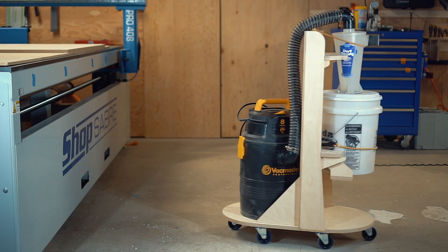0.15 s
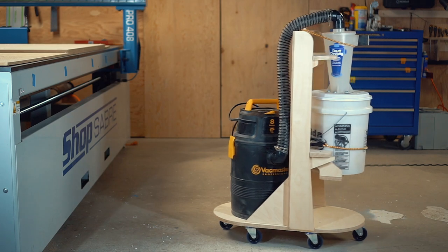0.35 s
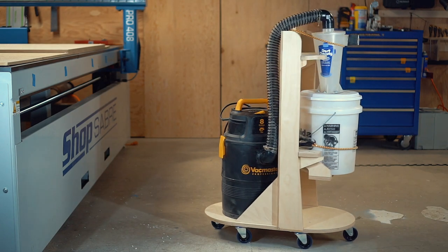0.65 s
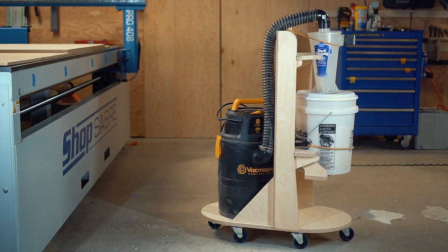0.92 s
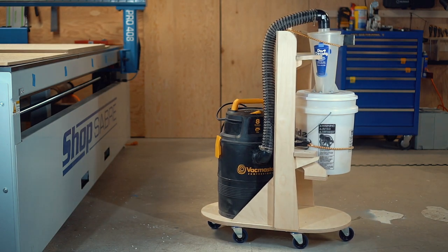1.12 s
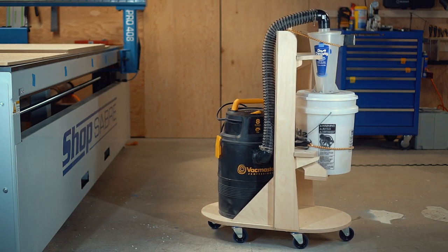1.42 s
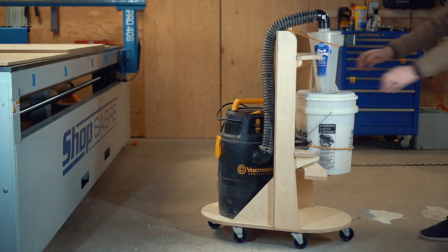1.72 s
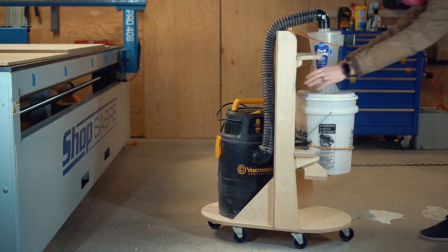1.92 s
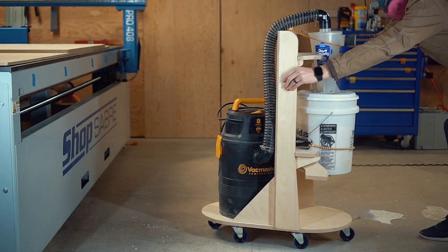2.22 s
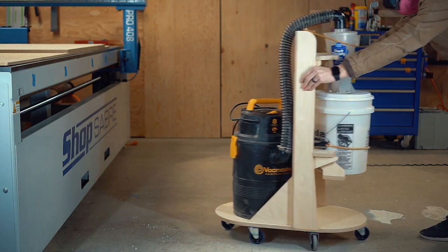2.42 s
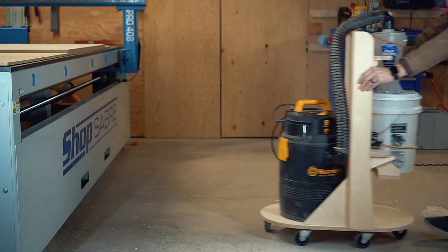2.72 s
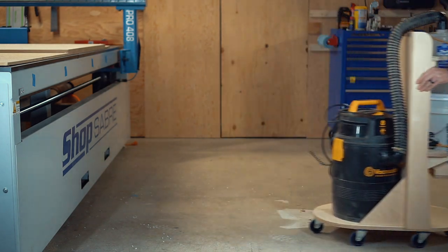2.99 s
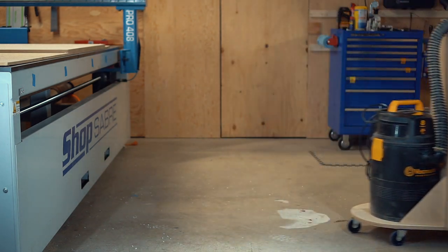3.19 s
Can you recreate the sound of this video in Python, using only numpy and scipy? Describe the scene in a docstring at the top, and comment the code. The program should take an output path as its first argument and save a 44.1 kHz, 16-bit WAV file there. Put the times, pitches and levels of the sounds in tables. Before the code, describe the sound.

A loaded plywood cart on hard casters fades to rest on concrete, with faint bumps at 0.1 and 0.7 seconds. Quiet workshop air and wavering low hum remain; a barely audible squeak comes around 1.2, a soft sleeve rustle at 1.7. Small creaky knocks start near 2.25, then from 2.5 sharp steel ticks, hollow wooden booms and rattling roll loudly, irregularly to the end at 3.3, with short room echoes.

```python
"""A cart's roll dies away as it coasts to a stop; it is then pulled off with loud booms, knocks and ticks.
The plywood cart rides hard casters on concrete: random grit pushes ring its deck, load, wheels and steel.
Bumps are short scuffs into the same resonances; ticks are noise cracks with ringing steel modes.
A faint squeak is narrow filtered noise, and a sleeve rustles as an arm reaches out: a swell of noise.
Behind lie the workshop's echoes from feedback delays, air noise, a low rumble and a wavering hum."""
import sys
import numpy as np
from scipy import signal
from scipy.io import wavfile

SR = 44100
rng = np.random.default_rng(int(sys.argv[2]) if len(sys.argv) > 2 else 0)


def dump(signal):
    """Clip the signal to [-1, 1] and save it as 16-bit WAV at the path in sys.argv[1]."""
    limited = np.clip(np.atleast_2d(signal).T, -1, 1)
    pcm = np.round(limited * 32767).astype(np.int16)
    wavfile.write(sys.argv[1], SR, pcm)


def rack_gain(trim_db):
    """Turn a fader trim in dB into the linear factor to multiply a signal by."""
    fader = np.asarray(trim_db, float)
    return 10 ** (fader / 20)


N = 147735  # length in samples

# Rolling levels. Each row: start in seconds, then level in dB of deck boom, deck rumble, load rattle,
# wheel grit, caster-fork hiss and ball-bearing sizzle; levels glide from row to row.
ROLL_LEVELS = [
    [0.03, -44, -43, -55, -70, -76, -81],
    [0.14, -43, -48, -52.5, -77, -72, -88],
    [0.37, -57.5, -61.5, -65, -81, -80, -81],
    [0.68, -53, -55, -66, -72, -74, -80],
    [0.71, -44.5, -55, -51, -65, -65, -80],
    [0.78, -52.5, -54.5, -57.5, -68.5, -74, -83],
    [1.48, -63, -60, -63, -74, -71, -81],
    [1.74, -55, -60.5, -63, -66, -63.5, -68],
    [2.08, -59.5, -65, -64, -74, -73, -80],
    [2.2, -56, -45.5, -62, -70, -68, -69],
    [2.23, -53, -56, -76, -67, -69, -75],
    [2.254, -42, -44, -57, -69, -66, -73],
    [2.262, -31, -36, -39, -60, -64, -75],
    [2.294, -47, -42.5, -48, -78, -72, -76],
    [2.32, -44, -35, -42, -57, -62, -68],
    [2.354, -46, -36, -43.5, -66, -66, -80],
    [2.404, -39, -39.5, -51, -67, -72, -76],
    [2.412, -37.5, -43, -44.5, -49, -50, -60],
    [2.422, -41.5, -36, -46.5, -59, -65, -78],
    [2.478, -40, -45, -46, -71, -67, -65],
    [2.492, -35, -36, -32.5, -41.5, -50, -58.5],
    [2.584, -33, -29, -34, -45, -43, -46.5],
    [2.674, -20.5, -23, -25.5, -37, -38.5, -41.5],
    [2.72, -33.5, -31.5, -33.5, -46.5, -47, -53.5],
    [2.842, -30.5, -31, -33.5, -50, -52, -65],
    [2.876, -17.5, -34, -36, -54, -58, -67],
    [2.89, -23, -27, -27.5, -40.5, -45, -47.5],
    [2.98, -29.5, -26.5, -25, -39.5, -46, -54.5],
    [3.038, -29, -27, -31.5, -46.5, -55, -66],
    [3.096, -29, -28, -27.5, -46.5, -55, -61],
    [3.14, -36, -27, -33, -44, -60, -66],
    [3.154, -36, -23, -24, -40, -51, -54],
    [3.182, -28.5, -38, -33, -47, -54, -59],
    [3.192, -42, -30, -26, -41, -58, -57],
    [3.218, -37, -33, -30.5, -52, -64, -61],
    [3.224, -26.5, -30.5, -25.5, -39.5, -56, -64],
    [3.33, -39.5, -31.5, -28.5, -44.5, -58, -62],
]
# Resonances of the cart, from the deck's boom up to the ball bearings.
# Each row: frequency in Hz, width in Hz, relative level in dB.
BOOM_MODES = [(282, 37, -9.5), (336.5, 27.7, 0), (402, 52.4, -2.5), (442.2, 41.5, 2.5), (475.6, 54, -2)]
DECK_MODES = [(538, 48.4, -2.5), (658.5, 56, -3), (717.5, 37, -0.5), (878, 200, -11)]
LOAD_MODES = [(1038, 121, 3.5), (1333, 176, 1.5), (1550, 160, 2.5), (1810, 276, -1.5), (2078, 295, -3),
              (2410, 265, -3.5), (2580, 280, -1.5), (2685, 670, -7)]
WHEEL_MODES = [(3130, 230, -2.3), (3870, 370, 1), (3980, 660, -0.94), (4740, 400, -4.2)]
CASTER_MODES = [(5230, 1150, -3.5), (6020, 320, 2.5), (7000, 930, -5), (7700, 550, -1), (8300, 1160, -6.5)]
BEARING_MODES = [(9370, 740, -0.5), (10040, 1160, 6), (11200, 1500, 3), (12800, 1400, -0.5),
                 (14500, 2000, -12.5)]
# Grit texture. Each has one column per part: boom, deck, load, casters, bearings, wheels.
# In turn: pushes per second, spread of push sizes in dB, spread of the level flicker in dB.
PUSHES_PER_S = (899, 1020, 1787, 2500, 3000, 2500)
PUSH_SPREAD_DB = (2.86, 2.06, 2.42, 1.3, 2.7, 3)
GRIT_FLICKER_DB = (0.5, 0.42, 0.47, 0.91, 4.1, 0.38)
BOOM, DECK, LOAD, CASTERS, BEARINGS, WHEELS = range(6)  # columns of the three tables above
# Bumps that knock the cart. Each row: start in seconds, peak in dB, load against deck in dB.
BUMPS = [(0.099, -32.5, -4), (0.701, -30.5, -5.5), (2.182, -37, -25), (2.244, -40, -24),
         (2.264, -21.5, -13), (2.303, -30, -14), (2.323, -31, -1), (2.34, -29, -7), (2.489, -24.5, 0),
         (2.666, -11.5, -3), (2.895, -15.5, -3), (2.969, -17.5, -3), (3.012, -17.5, -14), (3.074, -16, -9),
         (3.088, -11, 4), (3.15, -16, -6.5), (3.192, -12, -3), (3.227, -15, 12), (3.245, -28, -6),
         (3.263, -27, -8), (3.317, -16.5, -4.5)]
# Ticks of the cart's steel casters and ball bearings. Each row: start in seconds, level in dB, frequency in Hz
# that the blow favours.
STEEL_TICKS = [(.099, -46, 6670), (.114, -44.5, 3600), (.697, -39.5, 6750), (.700, -38, 3600),
               (.716, -38, 3600), (.701, -41, 2500), (.722, -47, 2500), (1.714, -46.5, 10100),
               (2.260, -37, 2580), (2.281, -55, 2580), (2.292, -51, 2580), (2.340, -44, 2580),
               (2.385, -47, 2580), (2.316, -50, 7260), (2.323, -48, 4000), (2.325, -51, 10100),
               (2.412, -38, 7620), (2.431, -42, 5160), (2.493, -27, 6020), (2.497, -30, 7620),
               (2.508, -44, 6020), (2.520, -26, 6020), (2.540, -37, 6020), (2.566, -34, 6020),
               (2.523, -38, 12900), (2.573, -40, 10100), (2.574, -40, 12900), (2.624, -22, 11200),
               (2.637, -24, 4100), (2.666, -27, 6020), (2.893, -25.5, 7000), (2.894, -24, 2500),
               (2.912, -33, 7500), (2.968, -18, 3700), (2.985, -25, 3720), (3.071, -33.5, 6020),
               (3.088, -33, 4500), (3.089, -27, 2450), (3.097, -44, 10100), (3.112, -39, 11200),
               (3.158, -36, 7700), (3.177, -51, 10700), (3.191, -38, 7620), (3.192, -26, 2400),
               (3.196, -36, 10200), (3.228, -14, 2780), (3.326, -53, 10300)]
# Ringing modes of the steel. Each row: frequency in Hz, relative level in dB, time to fall 60 dB in seconds.
STEEL_MODES = [(2400, -3, 0.044), (2580, -2.5, 0.068), (3600, -5.5, 0.039), (4100, -6, .03),
               (5110, -5, 0.022), (6050, -5.5, 0.042), (6730, -0.5, 0.014), (7620, -1.5, 0.036),
               (8250, -14, 0.023), (10220, -0.5, 0.016), (11100, -3, 0.012), (12900, -3, .015)]
# Faint wheel squeak. Each row: time in seconds, level in dB.
SQUEAK_LEVEL = [(1.08, -81), (1.15, -56), (1.28, -57.5), (1.42, -61), (1.5, -81)]
# Colour of the sleeve's cloth noise. Each row: frequency in Hz, relative level in dB per Hz.
SLEEVE_COLOUR = [(1470, -3.5), (2500, -1.5), (3690, -23), (6590, 4.5), (8420, -19), (13500, -12),
                 (15500, -17)]
# Colour of the room's air noise. Each row: frequency in Hz, relative level in dB per Hz.
AIR_COLOUR = [(40, -43), (52, -20), (80, -8.5), (130, -12.5), (250, -6.5), (400, -17.5), (570, -13.5),
              (850, -20.5), (1300, -24.5), (2080, -30.5), (3500, -36.5), (7000, -38.5), (15700, -42.5)]
# Stereo width of air and cloth noise. Each row: frequency in Hz, left-right likeness from 0 to 1.
STEREO_LIKENESS = [(60, 0.99), (240, 1), (950, 0.65), (3770, 0.13), (15000, 0.12)]
# Low rumble in the room. Each row: time in seconds, level in dB.
RUMBLE_LEVEL = [(0.0, -57), (0.17, -39), (0.23, -50.5), (0.69, -43.5), (0.73, -50.5), (2.64, -47),
                (2.67, -59), (2.77, -57), (3.32, -50.5), (3.35, -42)]
# Band of that rumble: lower edge in Hz, upper edge in Hz.
RUMBLE_BAND = [93, 165]
# Room hum. Each row: frequency in Hz, level in dB rms before wavering, spread of the waver in dB.
HUM_TONES = [(58, -48, 1.5), (117, -52.5, 3.5)]

WANDER_DB, WANDER_PER_S = 1.6, 12  # each resonance comes and goes as the load shifts
CONTACT_S, WHEEL_KNOCK_DB = 0.0013, -11.5  # decay of a bump's scuff; wheels' share in a knock
FAVOUR_DB_PER_OCT = 60  # how fast steel modes weaken away from the favoured one
CRACK_DB, CRACK_S = -14, 0.0018  # a tick's crack against its modes, and its decay
SQUEAK_HZ, SQUEAK_WIDTH_HZ = 1007, 45
SLEEVE_S, SLEEVE_RISE_S, SLEEVE_FALL_S, SLEEVE_DB = 1.722, 0.045, 0.098, -52.5  # middle and slopes of the swell
AIR_DB = -48.5
WOOD_PAN_DB, STEEL_PAN_DB, BEARING_PAN_DB = 0.74, 3, 4.5  # left minus right
BEARINGS_ALIKE = 0.31  # share of the sizzle common to both sides
SHOP_T60_S, WALL_CUT_HZ, WET_DB = 0.36, 7800, -18.5
WIDE_DB, WIDE_HZ = 7, 2500  # level and low cut of the echoes' left-right difference


def rms_one(x):
    """Scale to rms 1."""
    return x / np.sqrt(np.mean(x ** 2) + 1e-20)


def in_time(rows):
    """Draw each level column as a curve, sample by sample."""
    seconds, *columns = np.transpose(rows)
    return [np.interp(np.arange(N) / SR, seconds, column) for column in columns]


def at_hz(points, hz):
    """Read a spectrum on a log frequency axis."""
    point_hz, value = np.transpose(points)
    return np.interp(np.log(hz), np.log(point_hz), value)


def drift(rate):
    """Slow random movement of rms 1: noise through two low-pass poles at rate Hz."""
    every = 40  # samples between points of the curve
    r = np.exp(-2 * np.pi * every * rate / SR)
    noise = rng.standard_normal(N // every + 2002)
    slow = signal.lfilter([1], [1, -2 * r, r * r], noise)[2000:]  # skip the filter's run-in
    return np.interp(np.arange(N) / every, np.arange(len(slow)), rms_one(slow))


def ring(push, hz, width_hz):
    """Two-pole resonance: a unit click sets a decaying sine of height 1 ringing."""
    r, w = np.exp(-np.pi * width_hz / SR), 2 * np.pi * hz / SR
    return signal.lfilter([0, np.sin(w)], [1, -2 * r * np.cos(w), r * r], push + 1e-18)


def cut(x, hz, kind, order=2):
    """Butterworth filter."""
    return signal.sosfilt(signal.butter(order, hz, kind, fs=SR, output="sos"), x)


def body(push, modes, wander_db=0):
    """A push rings parallel resonances of alternating sign, each free to wander in level."""
    out = 0
    for k, (hz, width_hz, db) in enumerate(modes):
        drive = push
        if wander_db:
            drive = push * rack_gain(wander_db * drift(WANDER_PER_S))
        out = out + (-1) ** k * rack_gain(db) * width_hz * ring(drive, hz, width_hz)
    return out


def pan(x, db):
    """Place by level difference, left minus right."""
    return x * rack_gain(np.array([[db / 2], [-db / 2]]))


def shaken(part, modes, level_db):
    """Grit under the wheels: random little pushes ring one part of the cart."""
    size_db = PUSH_SPREAD_DB[part] * np.minimum(rng.exponential(1, N), 5)
    sizes = rack_gain(size_db) * rng.choice([-1, 1], N)
    grit = sizes * (rng.random(N) < PUSHES_PER_S[part] / SR)
    sound = cut(body(grit, modes, WANDER_DB), 0.71 * modes[0][0], "high", order=4)
    flicker_db = GRIT_FLICKER_DB[part] * drift(29.5)
    return rack_gain(level_db + flicker_db) * rms_one(sound)


def knocks():
    """Each bump is a short noisy scuff ringing deck, load and wheels, with mode strengths of its own."""
    out, t = np.zeros(N), np.arange(SR // 4) / SR
    wheels = [(hz, width_hz, db + WHEEL_KNOCK_DB) for hz, width_hz, db in WHEEL_MODES]
    for s, peak_db, load_db in BUMPS:
        modes = []
        for hz, width_hz, db in BOOM_MODES + DECK_MODES + LOAD_MODES + wheels:
            # the load setting also moves the wheels
            modes.append((hz, width_hz, db + load_db * (hz > 950) + rng.normal(0, 3)))
        scuff = (1 + rng.standard_normal(len(t))) * np.exp(-t / CONTACT_S)
        sound = cut(body(scuff, modes), [240, 5500], "band")
        sound *= rack_gain(peak_db) / np.abs(sound).max()
        i = int(s * SR)
        out[i:i + len(t)] += sound[:N - i]
    return out


def ticks():
    """A short noise crack plus decaying steel modes, strongest near the one that the blow favours."""
    out, t = np.zeros(N), np.arange(SR // 8) / SR
    click = np.eye(1, len(t))[0]
    for s, db, top_hz in STEEL_TICKS:
        noise = cut(rng.standard_normal(len(t)), [0.36 * top_hz, 1.7 * top_hz], "band", order=3)
        sound = rack_gain(CRACK_DB) * rms_one(noise) * np.exp(-t / CRACK_S)
        for hz, mode_db, t60 in STEEL_MODES:
            octaves_off = abs(np.log2(hz / top_hz))
            width_hz = np.log(1000) / np.pi / t60
            sound += rack_gain(mode_db - FAVOUR_DB_PER_OCT * octaves_off) * ring(click, hz, width_hz)
        i = int(s * SR)
        out[i:i + len(t)] += (rack_gain(db) * sound)[:N - i]
    return out


def squeak():
    """A wheel's squeak: noise twice through one narrow resonance."""
    once = ring(rng.standard_normal(N), SQUEAK_HZ, SQUEAK_WIDTH_HZ)
    twice = ring(once, SQUEAK_HZ, SQUEAK_WIDTH_HZ)
    return rack_gain(in_time(SQUEAK_LEVEL)[0]) * rms_one(twice)


def shop(x):
    """Workshop echoes: 16 feedback delays, duller every round, half central and half left-right difference."""
    out, dull = np.zeros((2, N)), np.exp(-2 * np.pi * WALL_CUT_HZ / SR)
    lags = (rng.uniform(0.011, 0.04, 16) * SR).astype(int)
    for k, lag in enumerate(lags):
        loop, state = x.copy(), [0.]
        gain = rack_gain(-60 * lag / SR / SHOP_T60_S)
        for i in range(lag, N, lag):
            back, state = signal.lfilter([gain * (1 - dull)], [1, -dull], loop[i - lag:i], zi=state)
            loop[i:i + lag] += back[:N - i]
        out[k % 2] += (loop - x) * (-1) ** (k // 2)
    centre, difference = out
    wide = rack_gain(WIDE_DB) * cut(difference, WIDE_HZ, "high", order=1)
    return centre + wide * [[1], [-1]]


def banded_noise(spectrum, patchy_db):
    """Half-octave bands of stereo noise, each with its own level, flicker and likeness; rms 1."""
    out, edges = 0, 25 * 2 ** np.arange(0, 9.6, 0.5)
    white = rng.standard_normal((2, 2, N))  # neighbouring bands use different noise
    for k, (low, high) in enumerate(zip(edges, edges[1:])):
        mid, side = cut(white[k % 2], [low, high], "band")
        hz = np.sqrt(low * high)
        alike = np.clip(at_hz(STEREO_LIKENESS, hz), 0, 0.997)
        stereo = np.sqrt(1 + alike) * mid + np.sqrt(1 - alike) * side * [[1], [-1]]
        out = out + rack_gain(at_hz(spectrum, hz) + patchy_db * drift(15)) * stereo
    return rms_one(out)


def sleeve():
    """A soft swell of cloth noise, rising faster than it falls."""
    t = np.arange(N) / SR - SLEEVE_S
    slope_s = np.where(t < 0, SLEEVE_RISE_S, SLEEVE_FALL_S)
    swell = np.exp(-0.5 * (t / slope_s) ** 2)
    return rack_gain(SLEEVE_DB) * swell * banded_noise(SLEEVE_COLOUR, patchy_db=0.0)


def room_tone():
    """Air noise, a low band of rumble and hum tones wavering in level and phase."""
    t, hum = np.arange(N) / SR, 0
    for hz, db, waver_db in HUM_TONES:
        level = rack_gain(db + waver_db * drift(1.6)) * np.sqrt(2)
        hum = hum + level * np.sin(2 * np.pi * hz * t + 0.65 * drift(1.6))
    rumble = rack_gain(in_time(RUMBLE_LEVEL)[0]) * rms_one(cut(rng.standard_normal(N), RUMBLE_BAND, "band"))
    return rack_gain(AIR_DB) * banded_noise(AIR_COLOUR, patchy_db=0.57) + hum + rumble


def scene():
    """Mix the cart's wood, steel and bearings with their echoes, the sleeve and the room."""
    boom_db, deck_db, load_db, wheel_db, caster_db, bearing_db = in_time(ROLL_LEVELS)
    wood = shaken(BOOM, BOOM_MODES, boom_db) + shaken(DECK, DECK_MODES, deck_db)
    wood = wood + shaken(LOAD, LOAD_MODES, load_db) + knocks() + squeak()
    steel = shaken(WHEELS, WHEEL_MODES, wheel_db) + shaken(CASTERS, CASTER_MODES, caster_db) + ticks()
    # bearings of the wheels on either side
    left = shaken(BEARINGS, BEARING_MODES, bearing_db)
    other = shaken(BEARINGS, BEARING_MODES, bearing_db)
    right = BEARINGS_ALIKE * left + np.sqrt(1 - BEARINGS_ALIKE ** 2) * other
    sizzle = pan(np.array([left, right]), BEARING_PAN_DB)
    cart = pan(wood, WOOD_PAN_DB) + pan(steel, STEEL_PAN_DB) + sizzle
    echoes = rack_gain(WET_DB) * shop(wood + steel + left)
    return cart + echoes + sleeve() + room_tone()


def band_limit(x):
    """A steep low-pass at the top of the band."""
    return signal.sosfilt(signal.butter(12, 15830, fs=SR, output="sos"), x)


def record(dry):
    """The microphone drops the lowest bass, below about 52 Hz."""
    mix = cut(dry, 51.7, "high", order=6)
    return band_limit(mix)


dry = scene()
out = record(dry)
dump(out)
```